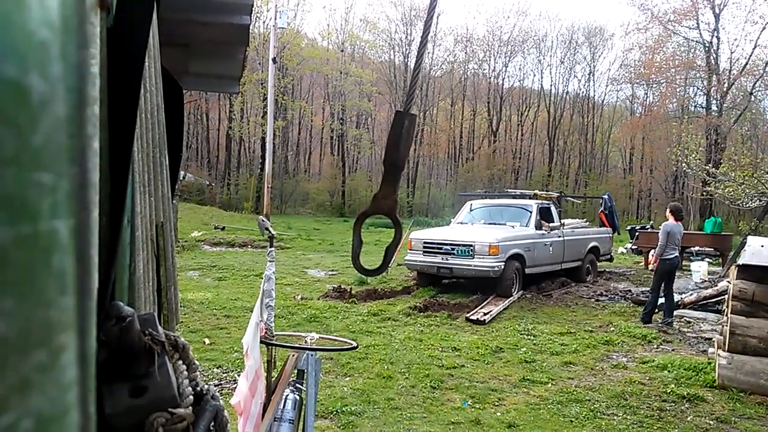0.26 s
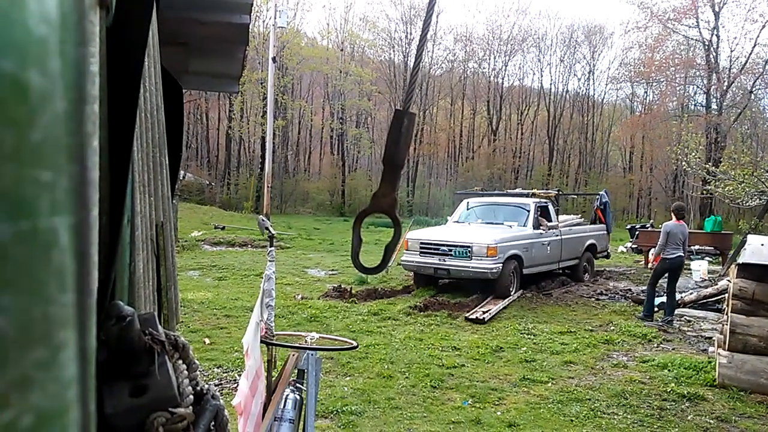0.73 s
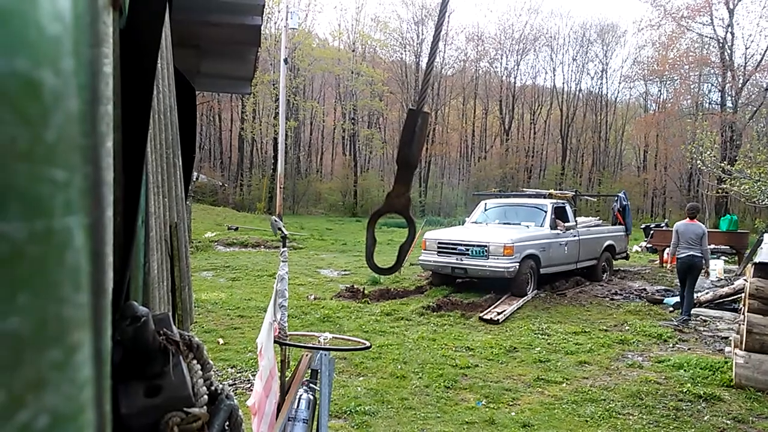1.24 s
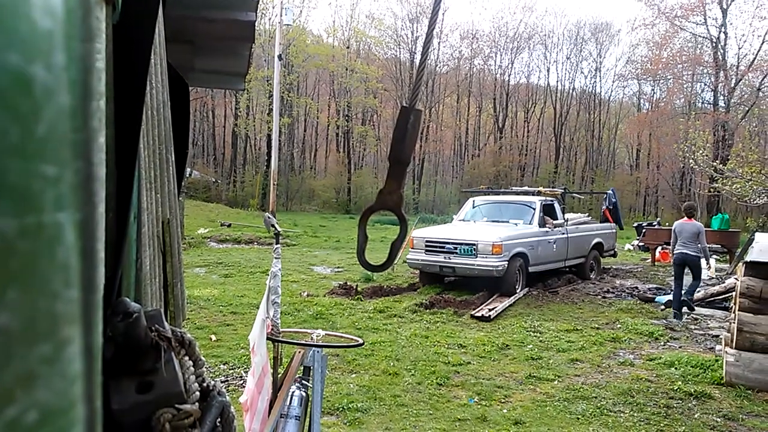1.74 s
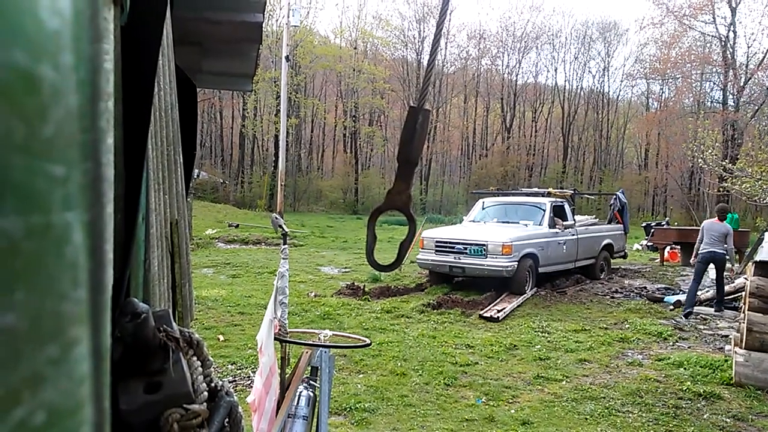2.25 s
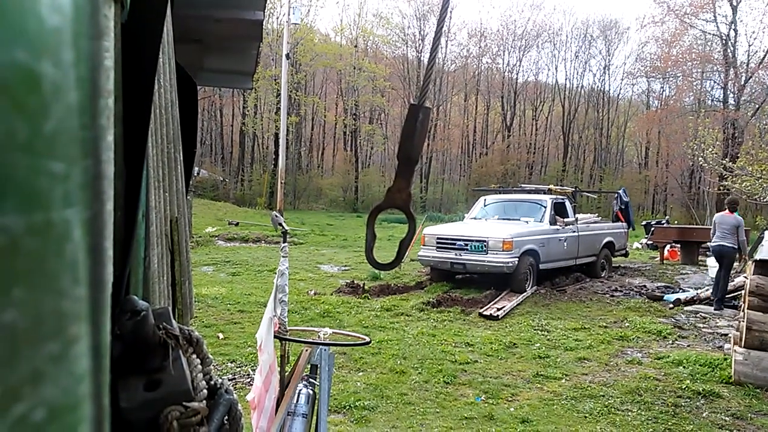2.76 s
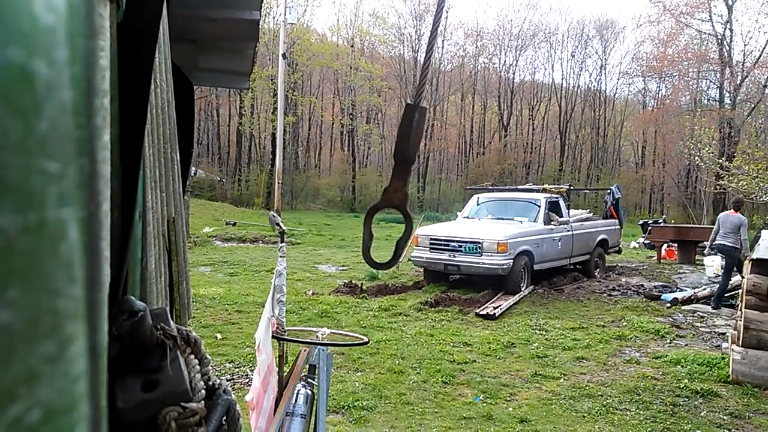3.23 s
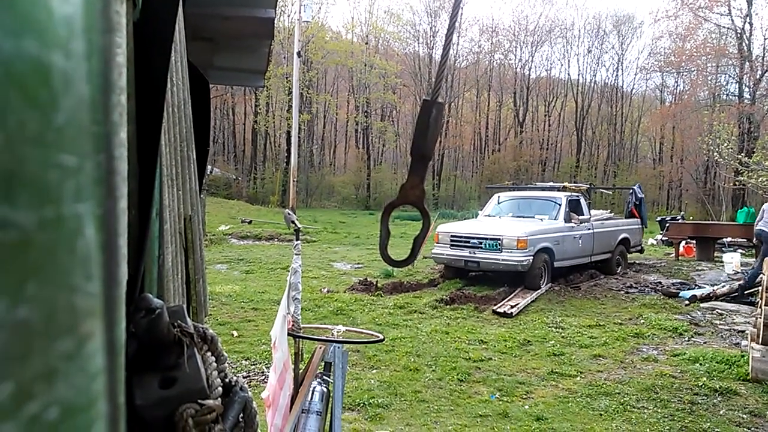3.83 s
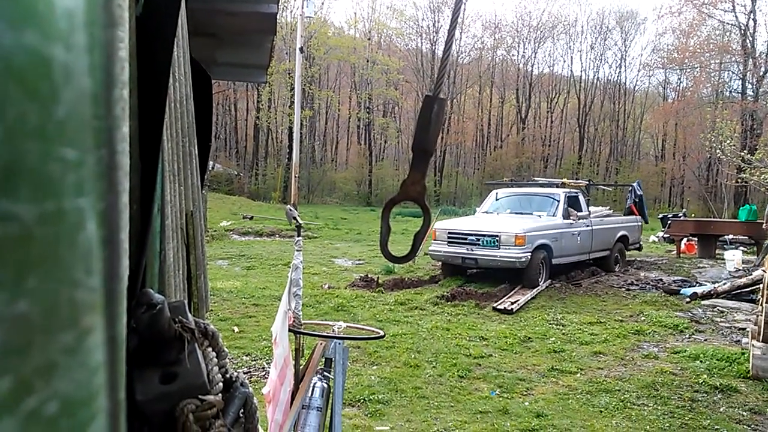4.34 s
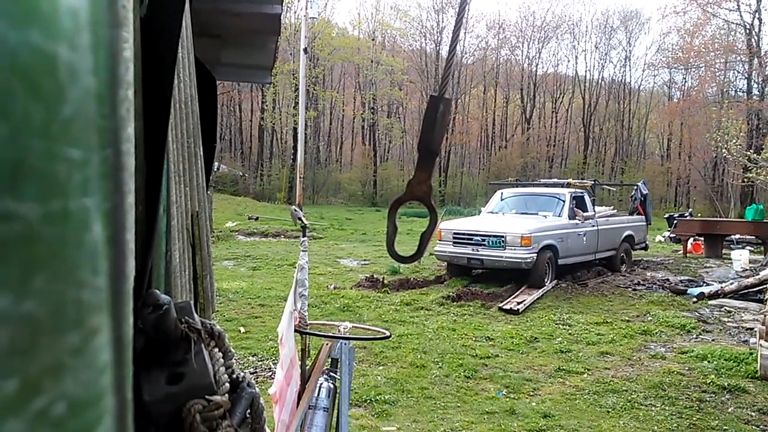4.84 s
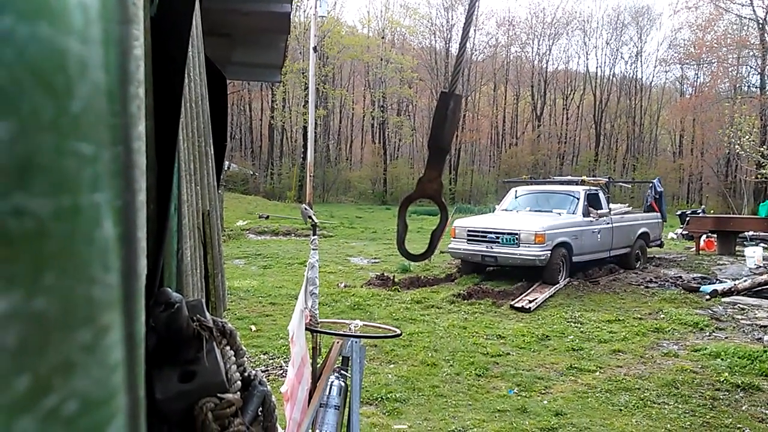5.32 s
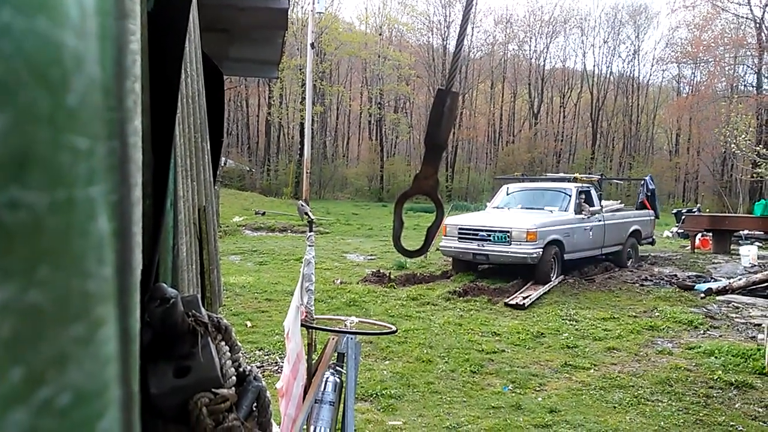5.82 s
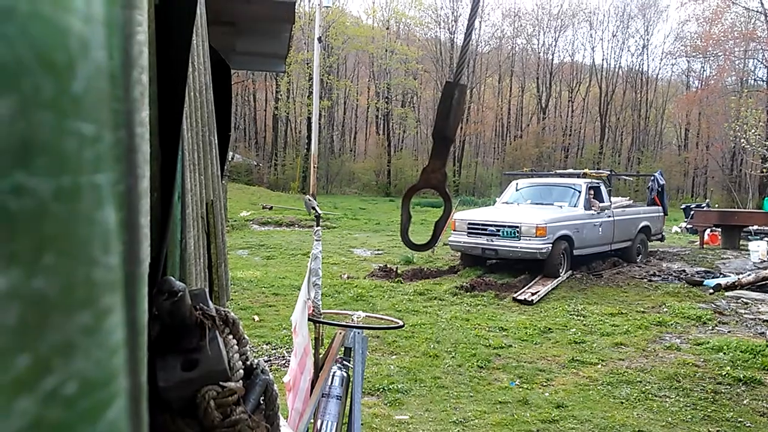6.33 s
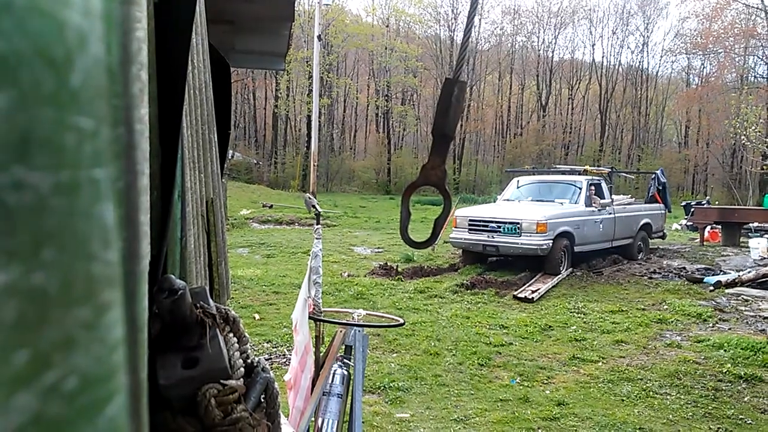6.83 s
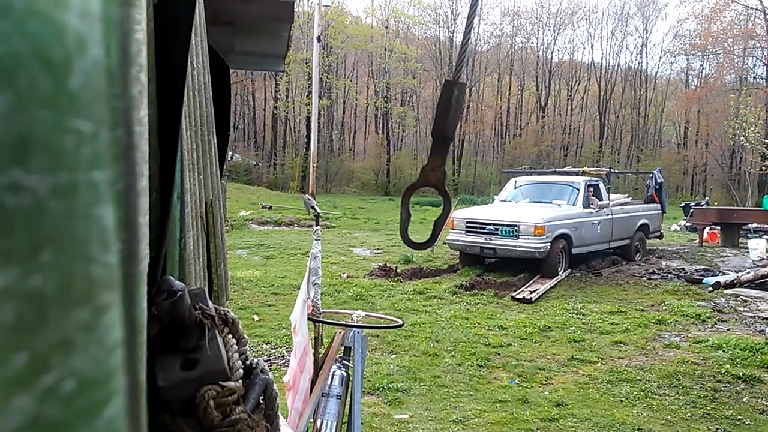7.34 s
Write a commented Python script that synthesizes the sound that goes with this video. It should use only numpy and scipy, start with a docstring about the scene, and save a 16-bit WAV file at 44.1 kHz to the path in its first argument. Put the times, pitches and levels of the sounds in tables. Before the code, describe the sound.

A rough V8 pickup engine runs outdoors in a grassy yard, heard from some distance. It coasts briefly, then is gunned six times at a steady rocking rhythm. Each burst bogs down, swells into a throaty roar with hissing intake, then barks and sags into a droning coast. Dull metallic knocks come early, the strongest around 2.5 seconds. The fifth burst is longest and highest, ending in a deep thump. A faint breeze lies beneath.

```python
"""An engine coasts for a moment, the chassis knocks, and six bursts of throttle rock a pickup stuck in mud.
Its V8 booms on the firing order under load and on the third order as it coasts: uneven pulses ring a long pipe.
Shaped noise makes the fan and valve gear, which rush with speed, and the intake, which hisses at each burst.
Short hisses and breathy tones mark the throttle opening, resonances ring in the knocks, and a breeze murmurs."""
import sys
import numpy as np
from scipy import signal
from scipy.fft import rfft, irfft, next_fast_len
from scipy.io import wavfile
from scipy.ndimage import uniform_filter1d, map_coordinates

SR = 44100
rng = np.random.default_rng(int(sys.argv[2]) if len(sys.argv) > 2 else 0)


def inscribe(sig):
    """Save sig as 16-bit PCM at rate SR to the path in sys.argv[1].

    A 1-D sig is mono; a 2-D sig holds one channel per row.
    Samples are clipped to [-1, 1] before scaling.
    """
    pcm = np.round(np.clip(np.atleast_2d(sig).T, -1, 1) * 32767)
    wavfile.write(sys.argv[1], SR, pcm.astype(np.int16))


N = 333837

# Bursts of throttle. Each row: start in seconds, length in seconds, wait for the revs to pick up in seconds,
# lowest speed in turns/s, climb in turns/s per second, highest speed in turns/s, relative roar in dB,
# relative intake in dB, delay of the bark after lift-off in seconds, relative bark in dB,
# relative coasting boom in dB.
BURSTS = [(0.328, .49, .12, 17, 46.2, 39.5, -38.5, -25.5, 0.015, -13.5, -27),
          (1.573, 0.49, 0.095, 17.3, 63.8, 42, -36, -25.5, 0.079, -15.5, -6.5),
          (2.88, 0.48, .01, 21.8, 39.5, 39.9, -39, -25, 0.081, -16.5, -11),
          (4.262, .46, .02, 21.6, 40.5, 39.8, -33, -26.5, 0.079, -15, -32),
          (5.511, 0.65, .02, 29, 47, 63.4, -29.5, -26, 0.07, -22, -17),
          (6.799, 0.47, .15, 32.6, 62.3, 52.5, -32, -26.5, 0.048, -16, -10)]
# Resonances of the engine bay. Each row: pitch in Hz, width in Hz, relative level in dB.
BAY_MODES = [(1010, 29, -12), (1346, 128, 10), (1574, 13.5, 14.5), (1794, 105, 8.5), (1920, 14, 10),
             (2356, 77, 11), (2940, 230, 7), (3355, 64, 8.5), (3834, 22, 10.5)]

START_TURNS, WORK_TURNS = 31.5, 39.16  # turns per second: at first, and where the relative levels hold
FRICTION = .0108  # share of its speed that the coasting crank loses each turn
# the clutch drags the revs down, they stay low, and they climb on just after the throttle shuts
DRAG_S, LABOUR_S, FLYWHEEL_S = .2, .1, .05
OPEN_S, CLOSE_S = 0.04, .11  # throttle attack and release
CRACK_S, CRACK_DB = 0.096, -7  # the throttle cracks open a little before each burst: lead, share of the air
SLACK_LEAD_S, SLACK_S, SLACK_DB = 0.2, 0.12, -1.5  # the engine goes slack before a burst: lead, half width, depth
BOOM_DELAY_S, BOOM_S = 0.36, 0.14  # coasting boom after the throttle shuts: delay, half width
BARK_S, BARK_FADE_S = 0.073, 0.073  # the overrun bark's rise and decay
RUMBLE_DB, BOOM_DB, RASP_DB = -20.5, -15, -24  # relative base levels of the exhaust's three registers
LOUDEST_BOOM_DB = -7.5  # ceiling of the boom on the same relative scale
FAN_DB, IDLE_FAN_DB = -38, -50  # relative fan rush at working speed, and the least it falls to
TOP_HZ = 15750  # nothing is kept above this


def amp(db):
    """Turn decibels into gain."""
    return 10 ** (np.asarray(db) / 20)


def decibels(*gains):
    """Level in dB of unrelated sounds together: their powers add."""
    return 10 * np.log10(sum(g ** 2 for g in gains) + 1e-12)


def unit(x):
    """Scale to rms 1."""
    return x / np.sqrt(np.mean(x ** 2) + 1e-20)


def steady(x):
    """Hold the rms near 1 from moment to moment."""
    power = np.abs(uniform_filter1d(uniform_filter1d(x * x, size=3600), size=2400))
    return x / np.sqrt(power + 1e-12)


def noise():
    """White noise: every pitch at once."""
    return rng.standard_normal(N)


def wobble(rate):
    """A smooth random curve through rate chance points a second."""
    knots = rng.standard_normal(int(N * rate / SR) + 4)
    return map_coordinates(knots, [np.arange(N) * rate / SR])


def filtered(x, response):
    """Multiply the spectrum of x by a response of frequency."""
    m = next_fast_len(N + SR // 2)
    return irfft(rfft(x, m) * response(np.fft.rfftfreq(m, 1 / SR)), m)[:N]


def coloured(x, points):
    """Shape x by a spectrum of (Hz, dB) points, at rms 1."""
    f, db = np.transpose(points)
    return unit(filtered(x, lambda hz: amp(np.interp(np.log(hz + 1), np.log(f), db))))


def ringing(x, modes):
    """Send x through (Hz, width Hz, dB) resonances of alternating sign, at rms 1."""
    def response(f):
        total = 0
        for k, (centre, width, db) in enumerate(modes):
            damping = 1j * f * width
            total = total + (-1) ** k * amp(db) * damping / (centre * centre - f * f + damping)
        return total
    return unit(filtered(x, response))


def band(x, lo_hz, hi_hz):
    """Pick one register of x and hold its rms near 1."""
    def response(f):
        low_cut = (1 + (lo_hz / (f + 1)) ** 16) ** -.5
        high_cut = (1 + (f / hi_hz) ** 16) ** -.5
        return low_cut * high_cut
    return steady(filtered(x, response))


def restless(x, depth_db):
    """Turbulence lets narrow bands swell and fade; the far treble stays smooth."""
    hz, _, z = signal.stft(x, SR, nperseg=1024)
    field = uniform_filter1d(rng.standard_normal(z.shape), size=3, axis=0)
    field = uniform_filter1d(field, size=9, axis=1)
    depth = depth_db / (1 + (hz[:, None] / 5500) ** 4)
    _, moving = signal.istft(z * amp(depth * unit(field)), SR, nperseg=1024)
    return unit(moving[:N])


def bell(x, centre, width):
    """A smooth hump of height 1."""
    return np.exp(-((x - centre) / width) ** 2)


def held(start, end, attack_s, release_s):
    """An envelope that rises at start, holds until end, then dies away."""
    t = np.arange(N) / SR
    return np.clip((t - start) / attack_s, 0, 1) * np.exp(-np.maximum(t - end, 0) / release_s)


def puff(s, length):
    """A flat-topped swell that starts at s and falls more slowly than it rises."""
    corners = s + length * np.array([0, .2, .7, 1.15])
    return np.interp(np.arange(N) / SR, corners, [0, 1, 1, 0])


def blows(rows, t60, attack_s):
    """Envelope of sudden (s, dB) blows that each drop 60 dB in t60 seconds."""
    t = np.arange(N) / SR
    return sum(amp(db - 60 * np.abs(t - s) / t60) * np.clip((t - s) / attack_s, 0, 1) for s, db in rows)


def crank():
    """Turns per second: in each burst the clutch drags the engine down, the throttle winds it up, and it coasts."""
    t = np.arange(N) / SR

    def coast(s, turns):
        return turns / (1 + FRICTION * turns * np.maximum(t - s, 0))

    speed = coast(0, START_TURNS)
    for s, length, wait, low, climb, high, *_ in BURSTS:
        pick_up, top = s + wait, s + length + FLYWHEEL_S
        dragged = speed + (low - speed) * np.clip(1 + (t - pick_up + LABOUR_S) / DRAG_S, 0, 1)
        wound = np.minimum(low + climb * (t - pick_up), high)
        top_speed = np.minimum(low + climb * (top - pick_up), high)
        speed = np.select([t < pick_up, t < top], [dragged, wound], coast(top, top_speed))
    return uniform_filter1d(speed, size=2200)


def clutch():
    """Load from 0 to 1: it comes on with the drag and fades after the throttle has shut."""
    load = 0
    for s, length, wait, *_ in BURSTS:
        bite = s + wait - LABOUR_S - DRAG_S
        load = load + held(bite, s + length + FLYWHEEL_S, attack_s=0.18, release_s=0.11)
    return np.clip(load, 0, 1)


def slack():
    """The lull before each burst, in dB."""
    t = np.arange(N) / SR
    return SLACK_DB * sum(bell(t, s - SLACK_LEAD_S, SLACK_S) for s, *_ in BURSTS)


def overrun():
    """Gain of the exhaust's bark just after each lift-off."""
    bark = 0
    for s, length, *_, delay, bark_db, _ in BURSTS:
        start = s + length + delay
        bark = bark + amp(bark_db) * held(start, start + BARK_S, BARK_S, BARK_FADE_S)
    return bark


def registers(speed, load):
    """Relative dB of rumble, boom and rasp: they follow speed and throttle; each lift-off barks, then booms."""
    # The pipe booms as the firing rate passes a resonance.
    # Each row: firing rate in Hz, half width in Hz, relative level in dB.
    rate_booms = [(114.5, 15, -9.5), (184.6, 28, -12)]
    t, octaves = np.arange(N) / SR, np.log2(speed / WORK_TURNS)
    bark, lull_db = overrun(), slack()
    throttle = sum(held(s, s + length, OPEN_S, release_s=.02) for s, length, *_ in BURSTS)
    coasting = sum(amp(db) * bell(t, s + length + BOOM_DELAY_S, BOOM_S) for s, length, *_, db in BURSTS)
    racing = throttle * np.clip((speed - 43) / 9, 0, 1)  # fast, even firing weakens the low orders
    resonance = sum(amp(db) * bell(4 * speed, hz, width) for hz, width, db in rate_booms)
    resonance = resonance * load * amp(-2 * (0.5 - throttle))

    rumble_base_db = RUMBLE_DB + throttle * (2.5 - 2.4 * octaves) - 18 * racing - 35 * bark + 0.52 * lull_db
    rumble_db = decibels(amp(rumble_base_db), 0.31 * coasting) + 1.4 * wobble(13)

    off_speed_db = -7 * np.abs(octaves)
    boom_base_db = BOOM_DB + off_speed_db - 2.5 * racing + lull_db
    lumps_db = 2.6 * wobble(26)
    boom_db = decibels(amp(boom_base_db), resonance, coasting, 1.1 * bark) + lumps_db

    rasp_base_db = RASP_DB + 14 * octaves + 5.26 * throttle
    rasp_db = decibels(amp(rasp_base_db), bark, amp(-37), 0.095 * coasting) + 1.2 * lull_db
    return rumble_db, np.minimum(boom_db, LOUDEST_BOOM_DB), rasp_db


def firings(turns, scatter_db):
    """Four pulses a turn, each with its cylinder's strength and some chance."""
    # Strength of each firing in turn, as plain gain: the two banks take uneven turns.
    strengths = [0.81, 0.51, 0.94, 1.28, 0.4, 1.87, 0.42, 1.16]
    at = np.flatnonzero(np.diff(np.floor(4 * turns)))
    pulses = np.zeros(N)
    pulses[at] = np.resize(strengths, len(at)) * amp(scatter_db * rng.standard_normal(len(at)))
    return pulses


def exhaust(turns, speed):
    """Uneven firings and turbulence ring the pipe; its three registers swell in turn."""
    # Standing waves of the exhaust pipe. Each row: pitch in Hz, width in Hz, relative level in dB.
    pipe_modes = [(62.2, 16.6, 2.5), (84, 31, -3), (111.7, 14.2, 5.5), (176.7, 34, 0), (215.9, 10.3, -6.5),
                  (249.3, 17.7, -7.5), (313.7, 35.7, -4), (368.5, 30, -5.5), (424.9, 18.4, -3.5),
                  (477.8, 4.8, -3.5), (508.4, 10.2, -7.5), (572, 73, -18.5), (762, 23, -18)]
    load = clutch()
    rumble_db, boom_db, rasp_db = registers(speed, load)
    fast = np.clip((speed - 36) / 15, 0, 1)  # high revs favour the upper orders

    def order(count):
        """A rough tone that repeats count times a turn."""
        return amp(4.55 * wobble(28)) * np.sin(2 * np.pi * count * turns + 0.24 * wobble(35))

    drone = amp(np.clip(0.3 * (boom_db - rasp_db - 13), -3, 7))
    pulling = (0.14 * drone + 0.1 * fast) * order(4) + 0.1 * fast * order(11 / 2)
    coasting = 0.11 * drone * order(3) * np.clip((46 - speed) / 6, 0, 1)
    coasting = coasting + fast * (.05 * order(11 / 2) + .11 * order(13 / 2))

    lag = .013 * wobble(150)  # in turns: pulses reach the tailpipe a little early or late
    pulses = unit(firings(turns + lag, scatter_db=4))
    gas = 0.72 * noise() * amp(1.55 * np.sin(np.pi * turns))  # the flow chuffs once an engine cycle: two turns
    drive = (0.39 + 0.55 * load) * pulses + gas + load * pulling + (1 - load) * coasting
    pipe = ringing(drive, pipe_modes)

    barking = np.clip(overrun() / amp(rasp_db), 0, 1)
    edge = amp(3.0 - 6.4 * (1 - load) * (1.5 - barking) * (1.5 - fast))  # slow coasting gives soft, dull pulses
    sharp = filtered(pipe, lambda hz: 1 - 1 / (1 + (hz / 450) ** 8))
    rumble = amp(rumble_db + 1.5) * band(pipe, 46, 90)
    boom = amp(boom_db - 1.6) * band(pipe, 90, 225)
    rasp = amp(rasp_db + 0.34 + 2.05 * wobble(45)) * band(pipe + (edge - 1) * sharp, 225, 950)
    return rumble + boom + rasp


def airflow(speed):
    """Relative dB of fan and intake: the fan follows speed; an open throttle adds roar and draws air."""
    octaves = np.log2(speed / WORK_TURNS)
    roar = intake_gain = 0
    for s, length, _, _, _, _, roar_db, intake_db, *_ in BURSTS:
        opened = held(s, s + length, OPEN_S, CLOSE_S)
        cracked = amp(CRACK_DB) * held(s - CRACK_S, s, CRACK_S, CLOSE_S)
        throttle = np.maximum(opened, cracked)
        roar = roar + throttle * amp(roar_db + 3.1 * octaves)
        intake_gain = intake_gain + throttle * amp(intake_db + 6.7 * octaves)
    fan_db = decibels(amp(FAN_DB + 15.4 * octaves + slack()), amp(IDLE_FAN_DB), roar)
    return fan_db, decibels(intake_gain)


def fan_and_valves(turns, speed, fan_db):
    """Noise pulsing with the crank makes the fan's rush and a valve clatter that rings harder with speed."""
    # Colour of the fan's rush. Each row: pitch in Hz, relative level in dB.
    fan_colour = [(500, -11), (700, 11), (850, -5), (1000, 5), (1150, -6.5), (1500, -6), (2300, 0),
                  (2900, -5.5), (3550, -11), (5300, 0), (6500, -12), (8300, -7), (11500, -21.5),
                  (15600, -31.5)]
    beat_db = 0.24 * np.sin(2 * np.pi * turns) + 0.49 * np.sin(2 * np.pi * 4 * turns)
    clatter = amp(beat_db + 0.54 * wobble(160) + 2.23 * wobble(18))
    metal = amp(-6) * (speed / 45) ** 1.46 * ringing(clatter * noise(), BAY_MODES)
    rush = restless(coloured(clatter * noise(), fan_colour), depth_db=2.2)
    return amp(fan_db + 6.5) * (rush + metal)


def intake(turns, speed, fan_db, intake_db):
    """Air is gulped once a firing and rings the engine bay, with a breathy whistle that rises with speed."""
    # Colour of the intake's hiss. Each row: pitch in Hz, relative level in dB.
    intake_colour = [(800, -31), (1300, 1.5), (2000, -25), (2800, -3.5), (3900, 1.5), (4500, -0.5),
                     (6300, -4), (7200, -10.5), (10000, -16.5), (15500, -33)]
    opening = np.clip((intake_db - fan_db + 6.0) / 5, 0, 1)  # coasting leaves the intake silent
    gulps = amp(0.61 * np.sin(2 * np.pi * 4 * turns) + 2.4 * wobble(60))
    hiss = coloured(gulps * noise(), intake_colour)
    beats = gulps * noise() + 0.9 * unit(firings(turns, scatter_db=2.5))
    air = restless(hiss + amp(-6) * ringing(beats, BAY_MODES), depth_db=4.2)
    whistle_hz = 3430 + 13 * speed + 55 * wobble(40)
    whistle = (speed / 55) ** 2 * wobble(260) * np.sin(2 * np.pi * np.cumsum(whistle_hz) / SR)
    return opening * amp(intake_db + 2.5) * (air + amp(-2.0) * whistle)


def spurts():
    """Bright puffs of shaped noise hiss as the throttle snaps open."""
    # Spurts of hiss. Each row: start in seconds, length in seconds, level in dB.
    spurt_rows = [(0.303, .05, -32), (0.359, 0.078, -26.5), (1.621, 0.1, -24.5), (2.964, 0.054, -33),
                  (4.297, 0.066, -24), (5.579, 0.097, -19.5), (5.713, 0.062, -22.5), (6.309, 0.034, -22.5),
                  (6.82, 0.067, -23), (6.953, 0.07, -21)]
    # Colour of the hiss. Each row: pitch in Hz, relative level in dB.
    spray_colour = [(1000, 2), (4000, 0), (5500, 8.5), (6800, 0), (8300, 4), (10500, -7.5), (15500, -16)]
    envelope = sum(amp(db) * puff(s, length) for s, length, db in spurt_rows)
    return envelope * coloured(noise(), spray_colour)


def hoots():
    """Air sings past the half-open throttle plate: short tones with fluttering pitch and level."""
    # Singing tones. Each row: start in seconds, length in seconds, pitch in Hz, relative level in dB.
    hoot_rows = [(0.302, 0.055, 5520, -36), (1.55, 0.11, 1268, -37), (2.86, 0.11, 1330, -47),
                 (2.902, 0.14, 3700, -53), (4.232, 0.13, 1274, -37.5), (4.507, 0.28, 3870, -28.5),
                 (5.426, 0.15, 2850, -35.5), (6.827, 0.074, 5400, -26.5), (7.151, 0.17, 1450, -26.5),
                 (7.123, .19, 4020, -26)]
    phase = 2 * np.pi * np.arange(N) / SR
    flutter = 2.2 * wobble(220)
    tones = sum(amp(db) * puff(s, length) * np.sin(hz * phase + flutter) for s, length, hz, db in hoot_rows)
    return tones * amp(3 + 4 * wobble(130))


def knocks():
    """Sharp strikes ring the chassis frame in a clunk, with a short noisy rattle dying away after it."""
    # Chassis knocks. Each row: start in seconds, relative level in dB.
    knock_rows = [(0.124, -24.5), (1.239, -27), (2.527, -12.5)]
    # Colour of the rattle. Each row: pitch in Hz, relative level in dB.
    rattle_colour = [(40, -32), (130, -5), (420, 13.5), (700, -3.5), (1300, -8), (3200, -9.5), (5000, -29),
                     (12000, -58)]
    rattle = blows(knock_rows, t60=.22, attack_s=.0013) * coloured(noise(), rattle_colour)
    strikes = np.zeros(N)
    for s, db in knock_rows:
        strikes[int(s * SR)] = amp(db)
    frame = ringing(strikes, [(140, 45, 0), (393, 80, 3), (720, 100, -7), (2800, 900, -33)])
    clunk = amp(6) * np.max(strikes) * frame / np.max(np.abs(frame))  # loudest clunk peaks 6 dB over its strike
    return clunk + rattle


def thumps():
    """The exhaust pipe thumps near its lowest resonance: a sudden low tone that dies away."""
    # Thumps as the engine bogs down or the throttle shuts at high revs.
    # Each row: start in seconds, level in dB before the soft attack.
    thump_rows = [(.365, -8), (6.2, -1), (6.28, -13)]
    pipe_hz = 60
    return blows(thump_rows, t60=0.76, attack_s=0.015) * np.sin(2 * np.pi * pipe_hz * np.arange(N) / SR)


def vacuum():
    """A thin, slowly wavering hiss of air drawn through the idle passage."""
    return amp(-49.5 + 2.4 * wobble(4.4)) * ringing(noise(), [(8000, 1600, 6), (5440, 600, -10)])


def breeze():
    """A light breeze: low noise that slowly swells and fades."""
    return amp(-35 + 2.6 * wobble(3.2)) * coloured(noise(), [(25, -27), (200, -25), (900, -79)])


def scene():
    """One crankshaft drives the exhaust, fan, valves and intake; the other sounds are laid over it."""
    speed = crank() * (1 + 0.0064 * wobble(20))
    turns = np.cumsum(speed) / SR
    fan_db, intake_db = airflow(speed)
    engine = exhaust(turns, speed) + fan_and_valves(turns, speed, fan_db)
    engine = engine + intake(turns, speed, fan_db, intake_db)
    return (engine + spurts() + hoots() + knocks() + thumps() + vacuum() + breeze())[None]


def record(dry):
    """Round off the highest peaks and keep nothing at or above the band limit."""
    x = dry[0] / (1 + np.abs(dry[0]) ** 6) ** (1 / 6)
    return filtered(x, lambda hz: hz < TOP_HZ)[None]


dry = scene()
out = record(dry)
inscribe(out)
```